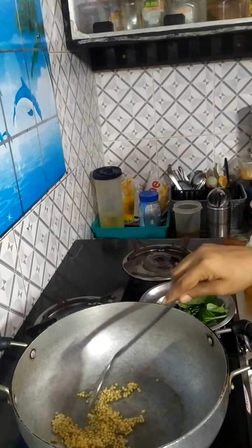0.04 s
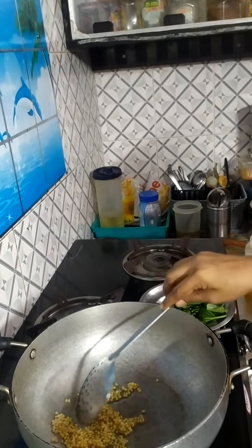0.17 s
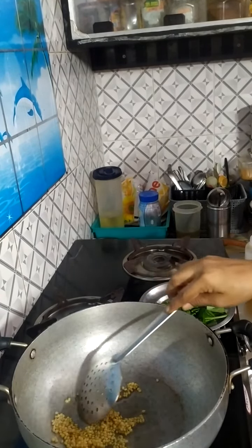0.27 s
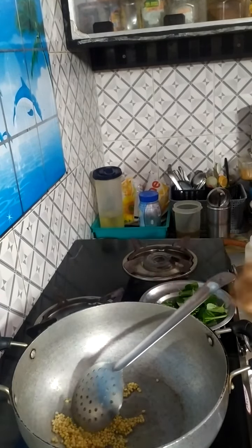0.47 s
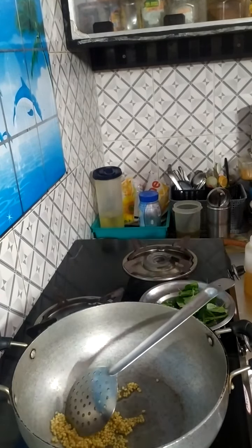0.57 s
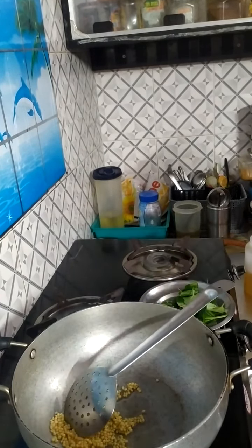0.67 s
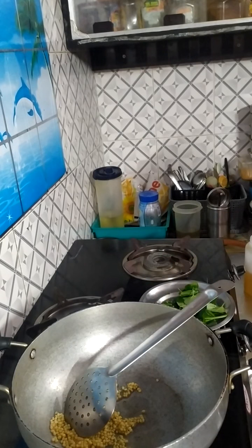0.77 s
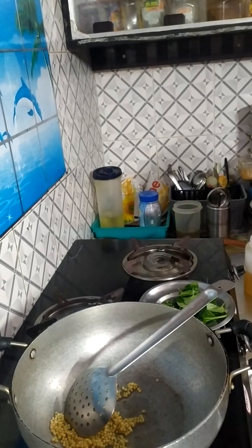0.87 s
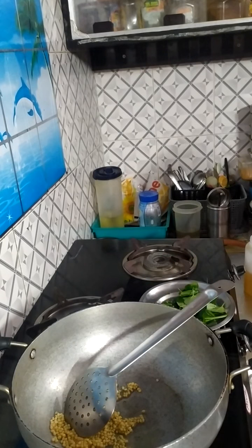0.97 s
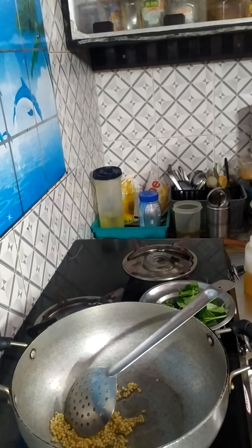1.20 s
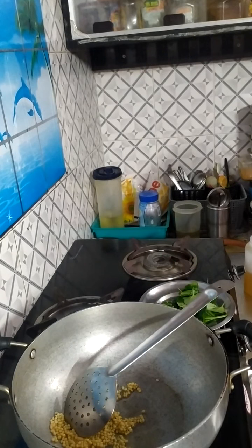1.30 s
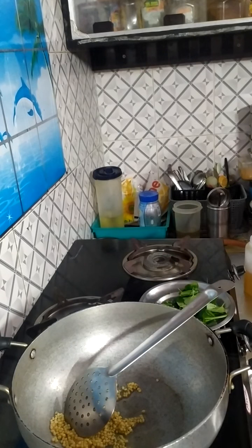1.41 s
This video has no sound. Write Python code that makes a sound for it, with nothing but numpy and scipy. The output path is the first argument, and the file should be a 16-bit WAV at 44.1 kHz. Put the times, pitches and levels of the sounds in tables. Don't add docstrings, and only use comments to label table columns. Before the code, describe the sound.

A metal ladle strikes a metal pan in a tiled kitchen, heard close. Faint scrapes at the start and a light touch near 0.17 seconds lead to a bright clank at 0.24, then a louder clattering knock on the rim from 0.39 to 0.48. Weak scraping fades by 0.67; tiny ticks follow around 0.9 and 1.3 to 1.4. Low fan hum, rumble and soft hiss run throughout.

```python
import sys
import numpy as np
from scipy import signal
from scipy.fft import rfft, irfft
from scipy.io import wavfile

SR = 44100
rng = np.random.default_rng(int(sys.argv[2]) if len(sys.argv) > 2 else 0)


def volts_from_decibels(level):
    exponent = np.asarray(level, float) / 20
    return 10 ** exponent


def transcribe(u):
    v = np.clip(np.atleast_2d(u).T, -1, 1)
    q = np.round(v * 32767).astype(np.int16)
    wavfile.write(sys.argv[1], SR, q)


N = 63945


def rms_one(x):
    return x / np.sqrt(np.mean(np.abs(x) ** 2) + 1e-20)


def at_hz(points, hz):
    points = np.array(points)
    return np.interp(np.log(hz), np.log(points[:, 0]), points[:, 1])


def filtered(x, order, hz, kind):
    return signal.sosfilt(signal.butter(order, hz, kind, fs=SR, output="sos"), x)


# (frequency [Hz], likeness [0-1])
LIKENESS = [(60, 1), (250, .6), (500, 0.56), (2000, 0.045), (12000, 0.029)]


def coloured(spectrum):
    hz = np.maximum(np.arange(N // 2 + 1) * SR / N, 5)
    mid, side = rfft(rng.standard_normal((2, N)), axis=1) * volts_from_decibels(at_hz(spectrum, hz))
    alike = np.clip(at_hz(LIKENESS, hz), -1, 1)
    ears = np.sqrt(1 + alike) * mid + np.sqrt(1 - alike) * side * [[1], [-1]]
    return rms_one(irfft(ears, N, axis=1))


# (frequency [Hz], density [dB per Hz])
AIR = [(18, -40), (30, -3), (160, -6.5), (241, -9.5), (335, -3.5), (368, -20), (481, 3.5), (529, -1.5),
       (1300, -33.5), (1690, -44.5), (2860, -120)]
# (frequency [Hz], density [dB per Hz])
HISS = [(590, -31), (1000, -2.5), (1540, -12.5), (2650, -6.5), (2870, -10), (7100, -14.5), (9490, -11.5),
        (16000, -19)]
# (multiple of the motor pitch [1], level [dB])
MOTOR = [(1, -69.5), (4, -70), (5, -62), (10, -69), (15, -69.5), (20, -70.5)]
# (frequency [Hz], width [Hz], level [dB])
DUCT = [(480, 25, -55), (346, 20, -62.5), (610, 30, -66.5), (435, 15, -67)]
AIR_DB, HISS_DB, MOTOR_HZ = -54, -60, 46.9


def fan():
    t = np.arange(N) / SR
    out = volts_from_decibels(AIR_DB) * coloured([*AIR, (1500, -53.5)])
    out += volts_from_decibels(HISS_DB) * coloured([(700, -52.5), *HISS])
    for k, db in MOTOR:
        ear_shift = min(k / 8, 1.5) * np.array([[0], [1]])
        phase = rng.uniform(0, 2 * np.pi) + ear_shift
        out += np.sqrt(2) * volts_from_decibels(db) * np.sin(2 * np.pi * round(k) * MOTOR_HZ * t + phase)
    for hz, width_hz, db in DUCT:
        pole = np.exp(np.pi * (2j * hz - width_hz) / SR)
        breath = rng.standard_normal((2, N + 4000))
        singing = signal.lfilter([1], [1, -pole], breath)[:, 4000:].imag
        out += volts_from_decibels(db) * rms_one(singing)
    return out


# (start [s], length [s], level [dB], brightness [dB per octave], place [0 bowl - 1 rim])
CONTACTS = [(.0, 0.015, -42, 7, 1), (.018, 0.015, -46, -0.5, 0.37), (.1735, 0.0083, -36, 7, 0.54),
            (.237, 0.0012, -18, 2, 0.076), (0.2403, 0.004, -15, 1.2, 0.15), (0.352, 0.061, -36.5, -0.16, 1),
            (0.385, 0.0042, -11, -1, 0.81), (0.389, .012, -22, 1, .9), (0.4, 0.03, -16, 1.73, 0.8),
            (0.439, 0.016, -18, -0.64, 0.76), (0.45, 0.03, -23.5, 3.6, .9), (0.535, 0.055, -36, -5, 0.83),
            (0.605, .055, -36.5, -3.0, 0.57), (0.911, .008, -50.5, -3.5, 0.21),
            (1.307, .004, -50, -4.8, .2), (1.366, 0.026, -53.5, -1.5, .4), (1.396, 0.0037, -44, 0.5, .2),
            (1.401, 0.033, -48, -3, 0.73)]
COLLISIONS_PER_S, SIZE_SPREAD_DB, RISE_S, FALL_S = 2500, 4.5, 0.00097, 0.0019
SWELL = 0.17


def flurries():
    t = np.arange(N) / SR
    struck = rng.random(N) < COLLISIONS_PER_S / SR
    sizes = volts_from_decibels(SIZE_SPREAD_DB * np.minimum(rng.exponential(1, N), 3))
    hits = struck * sizes * rng.choice([-1, 1], N)
    hits = rms_one(hits + 0.23 * rng.standard_normal(N))
    rows = []
    for start, length, db, _, _ in CONTACTS:
        rise_s = RISE_S + SWELL * max(length - .02, 0)
        rise = np.clip((t - start + RISE_S) / rise_s, 0, 1) ** 2
        fall = np.exp(-np.maximum(t - start - length, 0) / FALL_S)
        rows.append(volts_from_decibels(db) * rise * fall)
    return np.array(rows) * hits


WOBBLE_HZ, FLUTTER = 18, .55


def rocking():
    steps = rng.standard_normal((2, N // 100 + 2))
    phase = np.cumsum(steps[0]) * np.sqrt(200 * np.pi * WOBBLE_HZ / SR)
    knots = np.arange(len(phase))
    turn = np.interp(np.arange(N) / 100, knots, phase)
    level = np.interp(np.arange(N) / 300, knots, steps[1])
    return np.exp(1j * turn + FLUTTER * level)


PLACE_SPREAD_DB, EAR_SPREAD_DB, EAR_TURN = 3.5, 9, 2.4


def ringing(flurry, modes, weight, spread=0.96, loose=False, tilted=1):
    tilt = tilted * np.array(CONTACTS)[:, 3]
    out = np.zeros((2, N))
    chance = rng.standard_normal((len(CONTACTS), len(modes)))
    ears = rng.uniform(-0.7, 1, (len(modes), 2))
    for k, (hz, db, t60) in enumerate(modes):
        strength_db = db + tilt * np.log2(hz / 4000) + spread * PLACE_SPREAD_DB * chance[:, k]
        drive = (weight * volts_from_decibels(strength_db)) @ flurry
        pole = volts_from_decibels(-60 / (t60 * SR)) * np.exp(2j * np.pi * hz / SR)
        ring = signal.lfilter([.1], [1, -pole], drive + 1e-18)
        if loose:
            ring = ring * rocking()
        apart = EAR_SPREAD_DB / 8.7 * ears[k, 0] + 1j * EAR_TURN * ears[k, 1]
        apart = np.clip(hz / 500 - .3, 0, 1) * apart / 2
        out += np.imag(ring * np.exp([[apart], [-apart]]))
    return out


# (frequency [Hz], level [dB])
SHELL = [(240, -55), (400, -44.5), (636, -3.5), (1530, -18), (3070, -11.5), (3690, -15.5), (4950, -5.5),
         (10700, -12), (16000, -18)]
# (frequency [Hz], t60 [s])
SHELL_T60 = [(500, 0.24), (2000, 0.6), (6000, 0.23), (15000, .15)]


def shell_modes():
    hz = np.sort(16000 * rng.uniform(.14, 1, 150) ** 1.3)
    t60 = at_hz(SHELL_T60, hz) * rng.uniform(0.38, 1.0, 150)
    return np.transpose([hz, at_hz(SHELL, hz) - 14, t60])


SCATTER_S, CRACK_TOP_HZ = 0.0024, 11200


def scattered(x):
    paths = rng.standard_normal((2, 400)) * np.exp(-np.arange(400) / (SCATTER_S * SR))
    paths = paths / np.sqrt(np.sum(paths ** 2, axis=1, keepdims=True))
    return signal.fftconvolve(x[None], paths, axes=1)[:, :N]


def cracks(flurry):
    total = np.zeros(N)
    for row, tilt in zip(flurry, np.array(CONTACTS)[:, 3]):
        low_hz = np.clip(1800 * 2 ** (tilt / 4), 300, 7000)
        total += volts_from_decibels(tilt) * filtered(row, 3, [low_hz, CRACK_TOP_HZ], "band")
    return scattered(total)


# (frequency [Hz], width [Hz], share added [1])
DISH = [(3140, 360, 0.7), (3926, 160, -0.53), (1215, 150, -0.047), (1570, 690, -0.22), (518.7, 116, 0.06)]


def dish(x):
    for hz, width_hz, share in DISH:
        x = x + share * signal.lfilter(*signal.iirpeak(hz, hz / width_hz, fs=SR), x)
    return x


# (frequency [Hz], level [dB], t60 [s])
BLADE = [(760, 7, .07), (1895, -1, 0.07), (3117, 5, 0.043), (4316, 2, .07), (5486, -12, 0.064),
         (6713, -2, .1), (7014, -13, 0.097), (7472, -8, 0.12), (7900, 0.5, .02), (9480, -4, .12),
         (12240, -17, 0.13), (12080, -14, .1), (14400, -18, .18)]
# (frequency [Hz], level [dB], t60 [s])
RIM = [(1211, -2.5, 0.32), (3047, 0, 0.045), (3137, -3.5, 0.052), (4790, 0.5, .2), (5424, -8, 0.12),
       (6120, -12, .25), (7009, -18, .2), (8023, -4.5, .2), (9254, -8, .2), (10745, -7.5, 0.11),
       (11680, -13, .16), (13230, -9.5, .2), (14140, -12.5, .19), (14620, -21, .2)]
# (frequency [Hz], level [dB], t60 [s])
BOWL = [(632, -5, 0.22), (725, -11, .2), (796, -9.5, .1), (962, -8.5, 0.37), (1225, 3.0, 0.11),
        (1835, -17, .15), (2323, -18, .3)]
BLADE_DB, RIM_DB, BOWL_DB, SHELL_DB, CRACK_DB = -10.5, -12, -18.5, -10.5, 1.5
RING_PER_DB, METAL_LOW_HZ = 0.43, 540


def metal(flurry):
    _, _, db, _, place = np.transpose(CONTACTS)
    place = np.clip(place, 0, 1)
    firm = volts_from_decibels(RING_PER_DB * (db + 18.5))
    shell = shell_modes()
    sound = volts_from_decibels(BLADE_DB) * ringing(flurry, BLADE, firm * (1 - place), spread=.3, loose=True)
    sound += volts_from_decibels(RIM_DB) * ringing(flurry, RIM, firm * place, spread=.5, loose=True)
    sound += volts_from_decibels(BOWL_DB) * ringing(flurry, BOWL, firm * (0.047 + place), spread=.5, loose=True)
    sound += volts_from_decibels(SHELL_DB) * ringing(flurry, shell, firm, spread=0.33)
    sound += volts_from_decibels(CRACK_DB) * cracks(flurry)
    return filtered(dish(sound), 6, METAL_LOW_HZ, "high")


# (frequency [Hz], t60 [s])
KITCHEN_T60 = [(500, 0.63), (2000, 0.37), (6000, .4), (15000, 0.18)]
KITCHEN_DB, FIRST_ECHO_S = -9, 0.0044


def kitchen(x):
    t = np.arange(SR // 2) / SR
    echo = np.zeros((2, len(t)))
    edges = 16000 / 2 ** np.arange(6, -1, -1.)
    arrival = np.clip(t / FIRST_ECHO_S - 1, 0, 1)
    for low, high in zip(edges, edges[1:]):
        band = filtered(rng.standard_normal((2, len(t))), 2, [low, high], "band")
        echo += band * volts_from_decibels(-60 * t / at_hz(KITCHEN_T60, np.sqrt(low * high))) * arrival
    echo = echo / np.sqrt(np.sum(echo ** 2) / 2)
    return signal.fftconvolve(x, echo, axes=1)[:, :N]


# (frequency [Hz], level [dB], t60 [s])
STOVE = [(80.7, -19, 0.65), (96, -20, 0.16), (109.26, -16.5, 1.1), (190, -11, .2), (226, -3.5, 0.15),
         (279.8, -7.5, 0.73), (315, -4.5, 0.22)]
STOVE_DB, STOVE_LATE_S, WEIGHT_HZ = -25, 0.0085, 348


def stove(flurry):
    push = flurry + 0.73 * np.abs(flurry)
    push = np.pad(push, ((0, 0), (int(STOVE_LATE_S * SR), 0)))[:, :N]
    weight = 0.66 + 0.26 * np.array(CONTACTS)[:, 4]
    low = ringing(push, STOVE, weight, spread=0.27, tilted=0)
    return volts_from_decibels(STOVE_DB) * filtered(low, 3, [72, WEIGHT_HZ], "band")


SETTLE_S, SETTLE_LEN_S, SETTLE_DB, RECOVER_S = 0.667, 0.041, -6.5, 0.87


def settling():
    times = [SETTLE_S, SETTLE_S + SETTLE_LEN_S, RECOVER_S, RECOVER_S + .03]
    return volts_from_decibels(np.interp(np.arange(N) / SR, times, [0, SETTLE_DB, SETTLE_DB, 0]))


def scene():
    flurry = flurries()
    near = metal(flurry)
    ring = near + volts_from_decibels(KITCHEN_DB) * kitchen(near)
    return settling() * ring + stove(flurry) + fan()


def top_cut(x):
    return signal.sosfilt(signal.butter(12, 16660, fs=SR, output="sos"), x)


LOW_CUT_HZ, CUTOFF_HZ = 41, 16900


def record(dry):
    rounded = 1.074 * np.tanh(dry / 1.117)
    heard = filtered(rounded, 3, LOW_CUT_HZ, "high")
    mix = signal.sosfilt(signal.cheby2(10, 60, CUTOFF_HZ, fs=SR, output="sos"), heard)
    return top_cut(mix)


dry = scene()
out = record(dry)
transcribe(out)
```